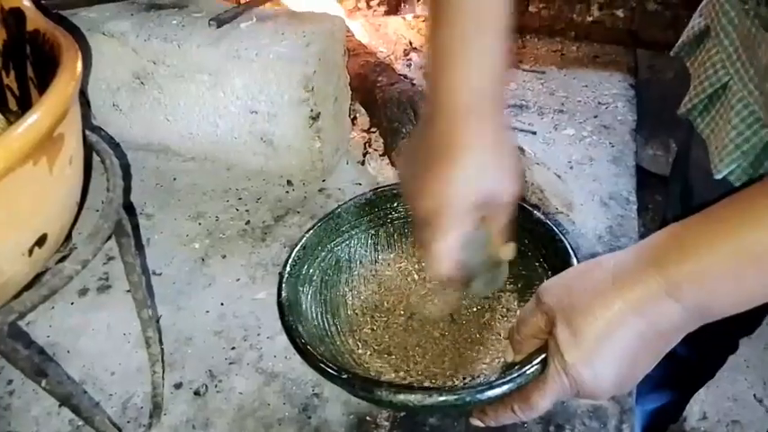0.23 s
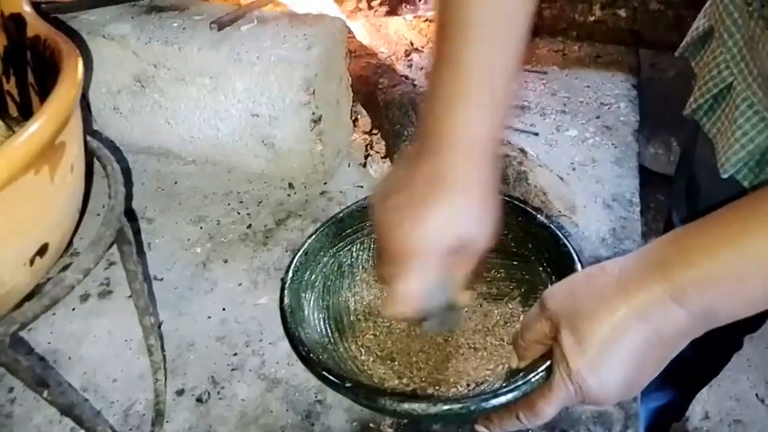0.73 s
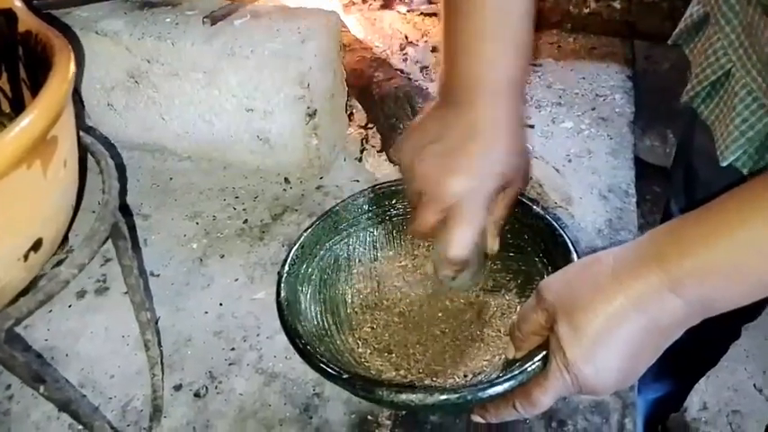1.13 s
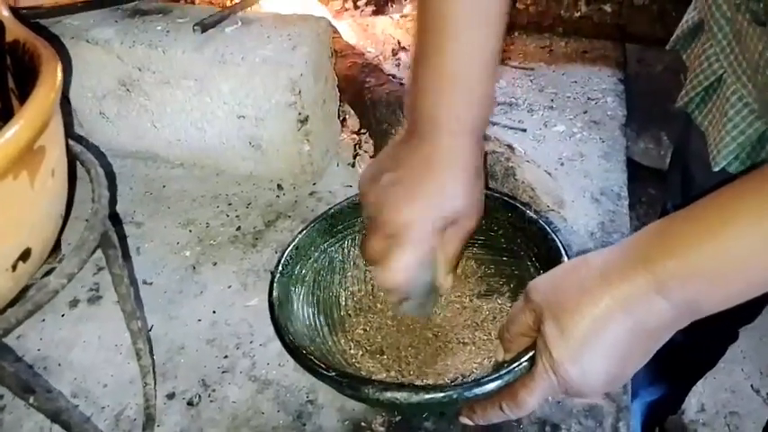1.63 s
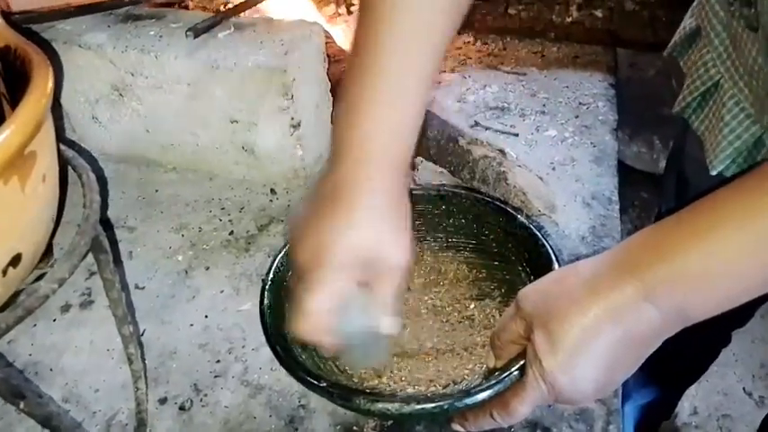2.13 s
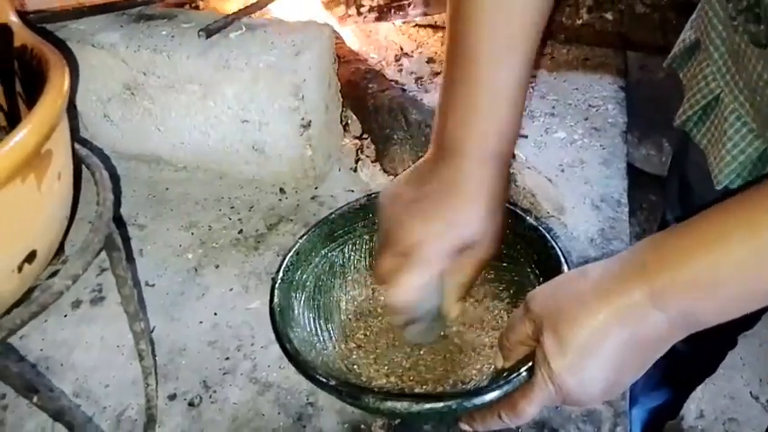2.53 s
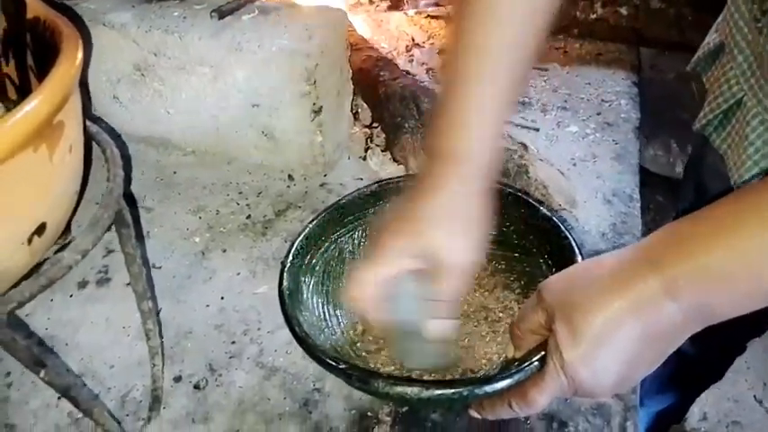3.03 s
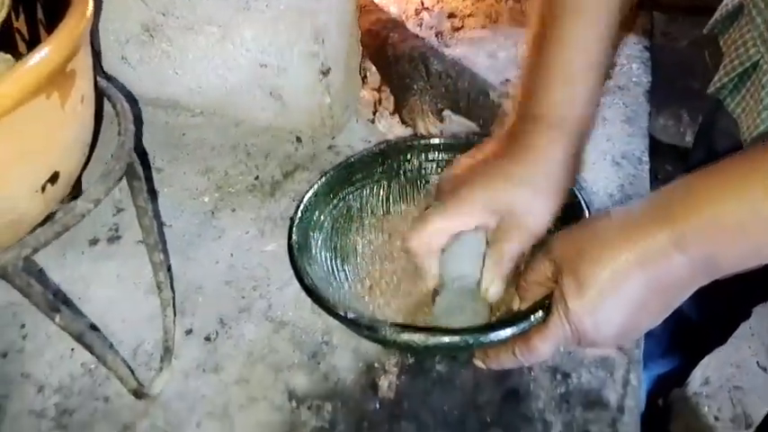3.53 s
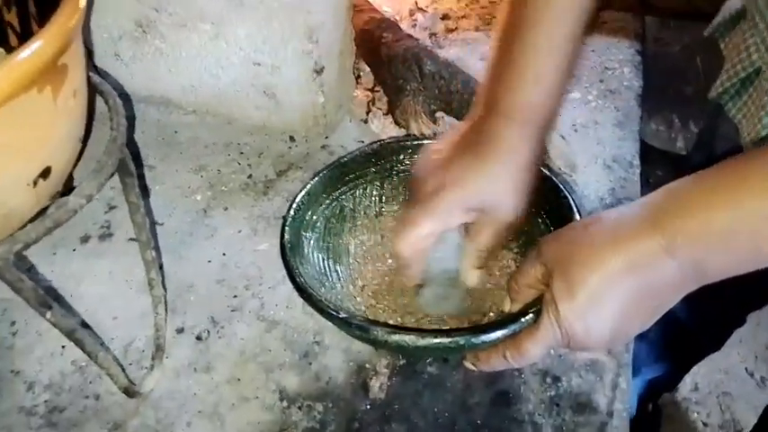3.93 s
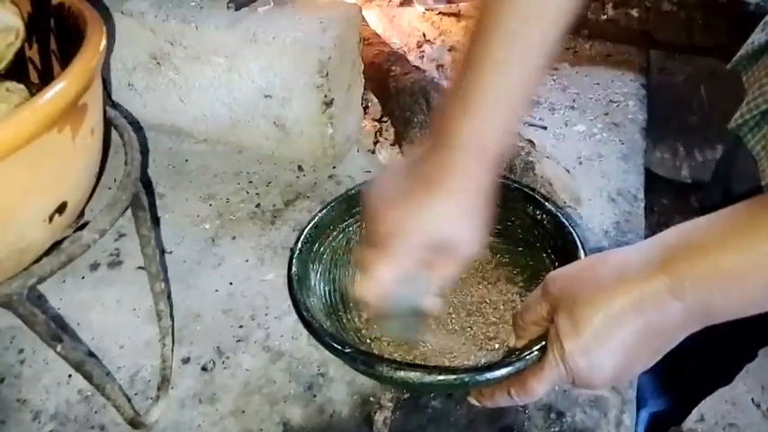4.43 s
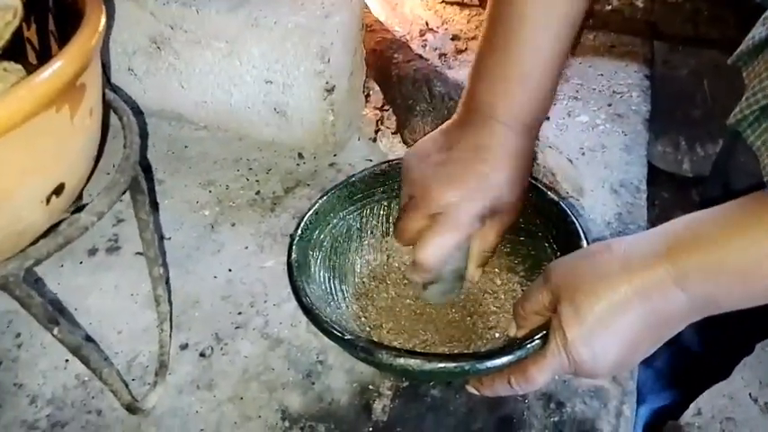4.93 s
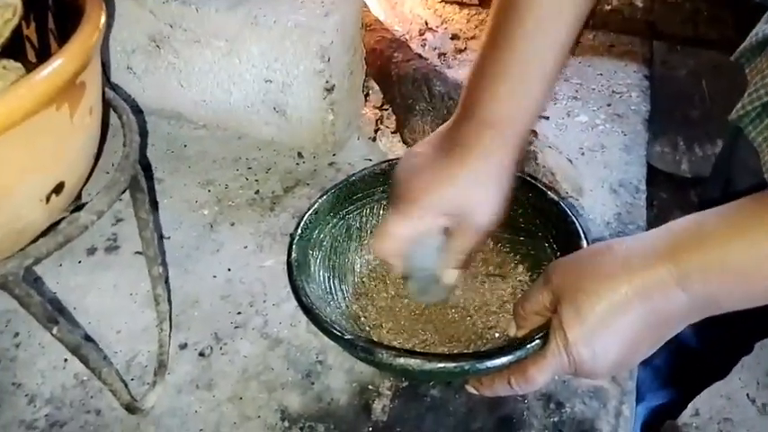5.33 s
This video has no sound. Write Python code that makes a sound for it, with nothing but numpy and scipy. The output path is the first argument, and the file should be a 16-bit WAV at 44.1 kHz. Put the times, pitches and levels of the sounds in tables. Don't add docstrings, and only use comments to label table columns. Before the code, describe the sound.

Grinding is already under way and continues to the end: brisk back-and-forth scrapes of stone on grit and ridged clay, stronger at first, somewhat softer and looser midway, then firm again after four seconds with a sharp crack near four and a half. Hollow knocks and tiny snaps pepper the strokes. Very quiet fire and room hush lies beneath, with only a short indoor echo.

```python
import sys
import numpy as np
from scipy import signal
from scipy.fft import rfft, irfft, next_fast_len
from scipy.io import wavfile

SR = 44100
rng = np.random.default_rng(int(sys.argv[2]) if len(sys.argv) > 2 else 0)


def volts(x):
    e = np.asarray(x, float) / 20
    return 10 ** e


def master(y):
    cut = np.clip(np.atleast_2d(y).T, -1, 1)
    pcm = np.round(cut * 32767)
    wavfile.write(sys.argv[1], SR, pcm.astype(np.int16))


N = 246078


def rms_one(x):
    return x / np.sqrt(np.mean(x ** 2) + 1e-20)


def lowpass(x, order, hz):
    return signal.sosfilt(signal.butter(order, hz, fs=SR, output="sos"), x)


def highpass(x, order, hz):
    return signal.sosfilt(signal.butter(order, hz, "high", fs=SR, output="sos"), x)


def along_time(table):
    return np.interp(np.arange(N) / SR, *np.transpose(table))


def drift(rate_hz):
    r = np.exp(-32 * np.pi * rate_hz / SR)
    noise = rng.standard_normal(N // 16 + 3002)
    slow = signal.lfilter([1], [1, -2 * r, r * r], noise)[3000:]
    return np.interp(np.arange(N) / 16, np.arange(len(slow)), rms_one(slow))


def grains(per_s, spread_db, alike):
    loudness_db = spread_db * np.minimum(rng.exponential(1, (3, N)), 4)
    sizes = volts(loudness_db) * rng.standard_normal((3, N))
    both, left, right = sizes * (rng.random((3, N)) < per_s / SR)
    share = np.clip(alike, 0, 1)
    return rms_one(np.sqrt(share) * both + np.sqrt(1 - share) * np.array([left, right]))


def body(force, modes, wander_db, blotch_db):
    out, energy = np.zeros((2, N)), 0
    for k, (hz, width, *side_db) in enumerate(modes):
        r = np.exp(-np.pi * width / SR)
        b = (1 - r * r) / 2 * np.array([1, 0, -1])
        a = [1, -2 * r * np.cos(2 * np.pi * hz / SR), r * r]
        share = volts(wander_db * drift(14.6) + blotch_db * drift(30))
        sign = (-1) ** ((k + 1) // 2)
        ringing = signal.lfilter(b, a, force * share + 1e-18)
        out += sign * volts(side_db)[:, None] * ringing
        energy += np.mean(volts(side_db) ** 2) * np.pi * width / SR
    return out / np.sqrt(energy)


# (frequency [Hz], density [dB per Hz])
HUSH = [(15, -20.5), (25, 3.5), (65, -23.5), (134, -11), (170, -28), (250, -3), (652, -15), (1210, -24),
        (3990, -17), (12200, -42.5), (15800, -65), (22000, -120)]


def hush():
    hz = np.arange(1, N // 2 + 2) * SR / N
    table_hz, table_db = np.transpose(HUSH)
    colour = volts(np.interp(np.log(hz), np.log(table_hz), table_db))
    both, left, right = rng.standard_normal((3, N))
    noise = 0.15 * both + np.array([left, right])
    return volts(-79.5) * rms_one(irfft(rfft(noise) * colour, N))


def stroke_db(table, weight, swell_db_per_s, dying_db_per_s):
    t, power = np.arange(0, N, 16) / SR, 0
    bite_s = 0.0089
    for bite, swell, hold, grit_db, press_db in table:
        crest_db = swell_db_per_s * swell
        rise_db = np.interp(t - bite, [-bite_s, 0, max(swell, .001)], [-45, 0, crest_db]) - crest_db
        fall_db = dying_db_per_s * np.maximum(t - bite - swell - hold, 0)
        power = power + volts(grit_db + weight * press_db + rise_db - fall_db) ** 2
    return np.interp(np.arange(N) / SR, t, power)


# (bite [s], swell [s], hold [s], grit [dB], pressure on the bowl [dB re grit])
JABS = [(0.0, 0.0019, 0.042, -43, -10), (0.305, 0.022, 0.052, -48, -12.5), (0.54, .012, 0.1, -61, 3),
        (0.93, 0.048, 0.027, -55, -12.5), (1.1, 0.014, 0.074, -62.5, 7.5), (1.18, 0.013, 0.068, -50, -13.5),
        (1.44, 0.015, 0.16, -57, -3), (1.51, .055, 0.053, -45, -9), (0.26, 0.069, .012, -57.5, 3),
        (1.66, 0.038, 0.018, -61, -6), (2.19, 0.09, 0.098, -59.5, -5), (2.7, 0.023, 0.047, -46.5, -8),
        (2.79, 0.045, 0.018, -61.5, 5), (3.12, 0.06, 0.062, -54, -2), (3.32, 0.017, 0.023, -46, -5.5),
        (3.88, .03, 0.018, -63.5, -4), (3.995, 0.038, 0.058, -47.5, -5.5),
        (4.305, 0.0041, 0.011, -49.5, -6), (4.366, 0.0067, 0.085, -45, -4), (4.45, .025, 0.025, -39, -5.5),
        (4.78, 0.012, 0.046, -62.5, -8.5), (4.865, 0.031, 0.05, -53, -15.5)]
STROKES = [(0.106, 0.023, 0.031, -37, -3.5), (0.43, 0.032, 0.033, -41.5, -5),
           (0.695, 0.026, 0.083, -40, -3.5), (0.99, 0.055, 0.016, -46, -1.5),
           (1.315, 0.016, 0.065, -39, -5), (1.7, 0.033, 0.011, -42, -3.5),
           (1.974, 0.042, 0.078, -48.5, -3.5), (2.275, 0.034, 0.058, -47, -3),
           (2.42, 0.016, 0.076, -46, -4.5), (2.585, 0.029, 0.038, -46, -3.5),
           (2.83, 0.011, 0.12, -46.5, -5.5), (3.005, 0.039, 0.024, -42.5, -5.5),
           (3.18, 0.066, 0.054, -44.5, -6.5), (3.395, 0.082, 0.026, -52, 4.3),
           (3.6, 0.018, 0.033, -44, -4.5), (3.72, 0.053, 0.0052, -44.5, 1.5),
           (4.075, 0.055, 0.02, -40.5, -0.5), (4.19, 0.017, 0.0097, -43, -6),
           (4.47, 0.018, 0.0048, -53, -2), (4.66, 0.066, 0.0077, -49.5, -6),
           (4.998, 0.041, 0.0078, -42.5, -7.5), (5.16, 0.057, 0.022, -49, -11),
           (5.343, 0.024, 0.014, -47.5, 5)]
# (time [s], level [dB re pressure])
BARE = [(0, -7), (.45, -11.5), (.61, -2), (.75, -5.5), (1.149, -6), (1.35, -2.5), (1.7, -17.5), (2.3, -13),
        (2.9, -21.5), (3.35, -14), (3.75, -27.5), (4.1, -15), (4.5, -13.5), (5.05, -12), (5.58, -32.5)]


def hand():
    grit = stroke_db(STROKES, 0, swell_db_per_s=173.5, dying_db_per_s=260)
    grit = grit + stroke_db(JABS, 0, swell_db_per_s=173.5, dying_db_per_s=600.5)
    press = stroke_db(STROKES, 0.77, swell_db_per_s=189, dying_db_per_s=257.5)
    press = press + stroke_db(JABS, 0.84, swell_db_per_s=189, dying_db_per_s=493.5)
    rest = volts(-93) ** 2
    grit_db, press_db = 10 * np.log10(np.array([grit, press]) + rest)
    return grit_db, press_db - grit_db, press_db - grit_db + along_time(BARE)


# (time [s], peak level [dB])
SNAPS = [(0.0339, -24.5), (0.1316, -26), (0.3801, -23.5), (0.4319, -51), (0.6689, -37), (0.8043, -14),
         (0.87, -23), (0.83, -30), (1.0006, -21), (1.1969, -23), (1.2205, -12.5), (1.243, -22),
         (1.2656, -18.5), (1.363, -16), (1.3822, -20), (1.4169, -21), (1.8, -41), (2.289, -17.5),
         (2.4594, -18), (2.6534, -22.5), (2.7369, -25.5), (3.1968, -19), (3.2585, -22), (3.4106, -18),
         (3.457, -19.5), (4.0731, -30), (4.4737, -16), (4.494, -11), (5.1307, -24), (5.1676, -30)]
# (time [s], peak level [dB])
CRUMBLES = [(0.1072, -29.5), (0.316, -35), (0.7158, -25), (1.033, -17), (1.3314, -20.5), (1.5625, -26),
            (1.9768, -30.5), (2.0333, -22.5), (2.0747, -26.5), (2.1071, -30.5), (2.136, -29.5),
            (2.3106, -31.5), (2.3669, -44), (2.595, -35), (3.0125, -23), (3.3333, -32), (3.3917, -23),
            (3.4475, -24.5), (3.63, -44), (3.7317, -27.5), (3.7603, -24), (3.7823, -21), (4.1145, -25),
            (4.1974, -23), (4.3842, -41), (4.7383, -35), (5.0424, -17), (5.075, -32.5), (5.2346, -30),
            (5.3913, -38)]


def crack_bursts():
    out, t = np.zeros(N), np.arange(2000) / SR
    for seeds, decay_s in (SNAPS, 0.0015), (CRUMBLES, 0.0075):
        shape = (1 - np.exp(-t / (0.83 * decay_s))) * np.exp(-t / decay_s)
        for s, db in seeds:
            out[round(s * SR):][:len(t)] += volts(db) * shape
    return out


# (time [s], peak level [dB], hardness [dB])
KNOCKS = [(0.088, -32.5, -18), (0.111, -17.5, -11.5), (0.436, -41, -8), (0.544, -16.5, -26.5),
          (0.671, -17, -2.5), (0.743, -17, -8), (1.035, -30, -22), (1.124, -16.5, -19.5),
          (1.288, -27.5, -13), (1.326, -22.5, 5.5), (1.357, -29, 10.5), (1.987, -36, -26),
          (2.109, -41, -18), (2.36, -24, -42), (2.605, -33, -36), (2.771, -29.5, -17), (3.019, -25, -22.5),
          (3.056, -29, -13), (3.351, -21, -17.5), (3.454, -22.5, -19), (3.764, -32, -27.5),
          (4.046, -29.5, -38), (4.075, -15, -10.5), (4.086, -30, -19), (4.13, -21, -4.5), (4.214, -20, -13),
          (4.388, -26.5, -37), (5.027, -59, -22), (5.362, -17.5, -21)]


def knock_force(gain_db, hard_weight, contact_hz):
    time_s, knock_db, hard_db = np.transpose(KNOCKS)
    level_db = knock_db + hard_weight * hard_db + gain_db
    at = np.round(time_s * SR).astype(int)
    chance = rng.uniform(0, 1, (len(at), 2))
    rebound = at + (SR * (.002 + .005 * chance[:, 0])).astype(int)
    clicks = np.zeros(N + 1000)
    clicks[at] = volts(level_db)
    clicks[rebound] = -volts(level_db - 26 * chance[:, 1] + 7.0)
    return lowpass(clicks[:N], 1, contact_hz)


GRIT_HZ = [2880, 3570, 4150, 4820, 5060, 5390, 5930, 6500, 6980, 7230, 8500, 10050, 10900, 11800, 13500]
# (width [Hz], left level [dB], right level [dB])
GRIT = [(128, -38, -49.5), (177, -10.5, 4), (246, -10, 2.5), (72, -1, -21), (169, -17.5, -21),
        (148, -5.5, -23.5), (230, -9, -45), (486, -10.5, -41.5), (170, -28.5, -7), (236, -5.5, -12.5),
        (600, -6, -21.5), (770, -10.5, -5), (610, -2.5, -28), (593, -14, -35), (1710, -0.5, -9.5)]


def grit_hiss(grit_db, lumps_db, cracks):
    grit = (volts(grit_db + 3.5 + lumps_db) + cracks) * grains(9000, 2.4, alike=0.16)
    force = grit + knock_force(6, 1, contact_hz=9000)
    top = body(force, np.c_[GRIT_HZ, GRIT], wander_db=3.0, blotch_db=3.0)
    return highpass(top, 4, 3000)


# (frequency [Hz], width [Hz], left level [dB], right level [dB])
BOWL = [(240.3, 70, -15, -11), (296, 15, -12.5, -1.5), (378.6, 36, -1.5, 2.5), (492, 120, -13.5, -17),
        (515.4, 46, -9, -8), (605, 50, -6.5, -2), (694.5, 53, 4, -16.5), (774, 100, 0.5, -13.5),
        (880, 39.8, 2, 7.5), (959, 205, -6, -14.5)]
# (time [s], tilt [dB])
PLACE = [(0, -5.5), (.2, 6), (.55, -3), (.75, -2.7), (1.101, -5), (1.33, -2), (1.42, -6), (1.75, 5),
         (2.099, 0.9), (2.6, -0.2), (3.1, 1.5), (3.45, 0.5), (3.799, 2.5), (4.15, 5), (4.4, -0.5),
         (4.52, -3.5), (5.05, 3), (5.4, -4.5)]


def bowl_wall(grit_db, press_db, lumps_db, cracks):
    lumpy = volts(grit_db + 0.95 * lumps_db + 0.98 * drift(27))
    press = volts(press_db - 1.5) * (lumpy + volts(-11.5) * cracks)
    press = press * grains(4000, 1.75, alike=0.84)
    dull = knock_force(5, -0.26, contact_hz=417)
    rap = knock_force(15, 0.32, contact_hz=2500)
    rap = highpass(rap, 2, 600)
    bowl = body(press + dull + rap, BOWL, wander_db=2.0, blotch_db=2.0)
    bowl = lowpass(bowl, 2, 1500)
    tilt = volts(along_time(PLACE))
    deep = signal.sosfiltfilt(signal.butter(2, 560, fs=SR, output="sos"), bowl)
    return deep / tilt + (bowl - deep) * tilt


# (frequency [Hz], width [Hz], left level [dB], right level [dB])
RIM = [(1113, 120, 4.5, 3), (1487, 212, 3.5, 0.5), (1586, 30, -38.5, -5.5), (2265, 73, -2.5, -5.5),
       (2620, 140, -0.5, -14)]


def bowl_rim(grit_db, bare_db, lumps_db, cracks):
    lumpy = volts(grit_db + 0.44 * lumps_db + 0.33 * drift(40))
    bare = volts(bare_db - 3.0) * (lumpy + volts(-9.0) * cracks)
    force = bare * grains(5000, 0.47, alike=0.66) + knock_force(3.5, 1, contact_hz=5860)
    return body(force, RIM, wander_db=4.5, blotch_db=-3.5)


# (frequency [Hz], width [Hz], left level [dB], right level [dB])
HEARTH = [(40, 13, -0.45, -6.5), (88, 390, -1, 3.5), (130, 65, 0, -7)]


def hearth_thud(grit_db, bare_db):
    thrust = volts(0.58 * (grit_db + bare_db) + 10) * grains(3400, 1.7, alike=0.27)
    return volts(-57.5) * body(thrust, HEARTH, wander_db=6.5, blotch_db=6.5)


def grinding():
    grit_db, press_db, bare_db = hand()
    lumps_db = 0.4 * drift(26) + 2.38 * drift(92)
    cracks = crack_bursts()
    near = grit_hiss(grit_db, lumps_db, cracks)
    near = near + bowl_wall(grit_db, press_db, lumps_db, cracks)
    near = near + bowl_rim(grit_db, bare_db, lumps_db, cracks)
    return near, hearth_thud(grit_db, bare_db)


def kitchen(x, t60, wall_hz):
    size = next_fast_len(N + SR)
    w = 2 * np.pi * np.arange(size // 2 + 1) / size
    absorption = 1 + 1j * w * SR / (2 * np.pi * wall_hz)
    out = []
    for side in x:
        tail = 0
        for k, lag in enumerate(rng.uniform(0.0038, .03, 8) * SR):
            loop = volts(-60 * lag / SR / t60) * np.exp(-1j * w * lag)
            tail = tail + (-1) ** k * loop / (1 - loop)
        out.append(irfft(rfft(side, size) * tail / absorption, size)[:N])
    return np.array(out)


def scene():
    near, thud = grinding()
    near = highpass(near, 4, 215)
    return near + volts(-15.0) * kitchen(near, t60=0.17, wall_hz=4900) + thud + hush()


PORT_TOP_HZ = [7550, 12050]
PORT_ORDER = [10, 22]
PORT_LEAK_DB = [-34, -25]


def microphone_ports(dry):
    ports = []
    for side, hz, order, leak_db in zip(dry, PORT_TOP_HZ, PORT_ORDER, PORT_LEAK_DB):
        ports.append(lowpass(side, order, hz) + volts(leak_db) * side)
    ports = ports + volts(-87.5) * rng.standard_normal(dry.shape)
    return signal.sosfilt(signal.cheby2(12, 50, 15300, fs=SR, output="sos"), ports)


def drop_weak_bands(side, margin_db, db_per_octave, whim_db):
    spectrum = signal.stft(side, window="cosine", nperseg=2048)[2]
    bands = spectrum[1:].reshape(128, 8, -1)
    level_db = 10 * np.log10(np.mean(np.abs(bands) ** 2, axis=1) + 1e-20)
    octave = np.log2(np.arange(128) + .5)
    reach_db = db_per_octave * np.abs(octave[:, None] - octave)
    cover_db = np.max(level_db[None] - reach_db[:, :, None], axis=1) - margin_db
    covered = level_db < cover_db + whim_db * rng.standard_normal(level_db.shape)
    spectrum[1:] *= np.repeat(np.where(covered, .03, 1), 8, axis=0)
    return signal.istft(spectrum, window="cosine", nperseg=2048)[1][:N]


def roll_off(x):
    return signal.sosfilt(signal.butter(12, 14290, fs=SR, output="sos"), x)


def record(dry):
    ports = microphone_ports(dry)
    mix = np.array([drop_weak_bands(side, margin_db=10.5, db_per_octave=22, whim_db=3.0) for side in ports])
    return roll_off(mix)


dry = scene()
out = record(dry)
master(out)
```